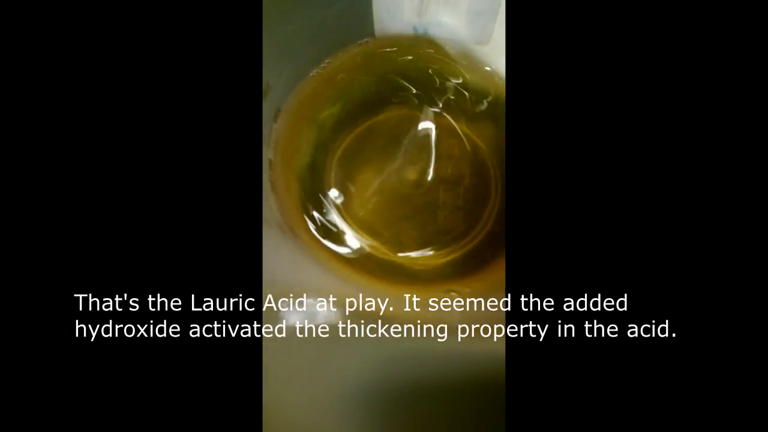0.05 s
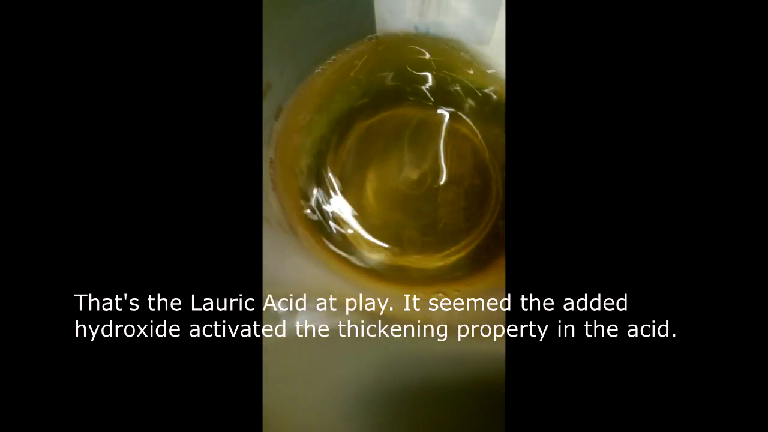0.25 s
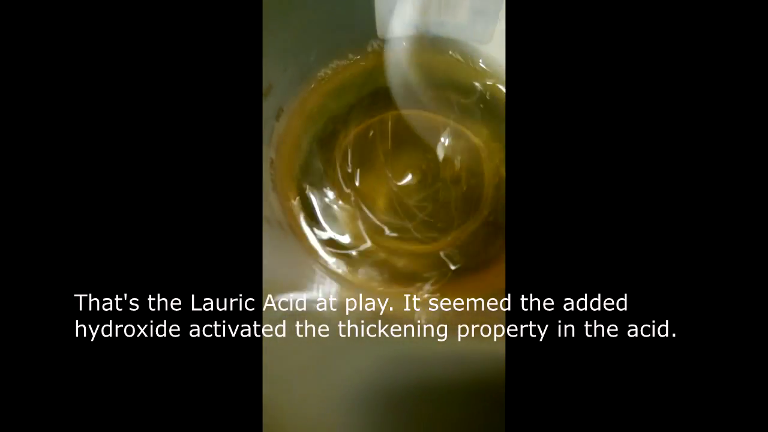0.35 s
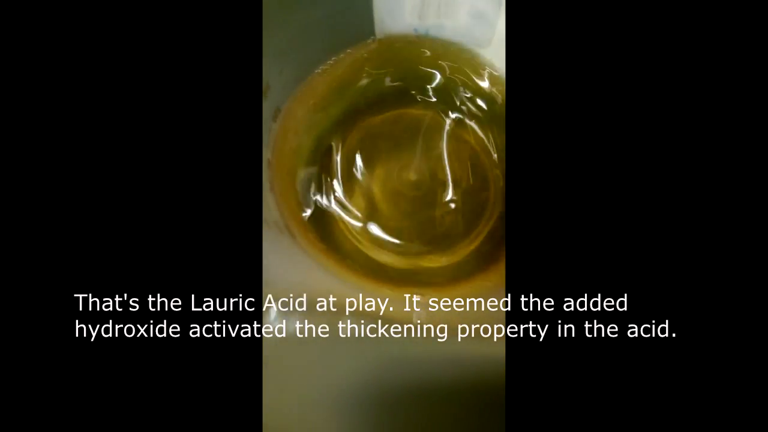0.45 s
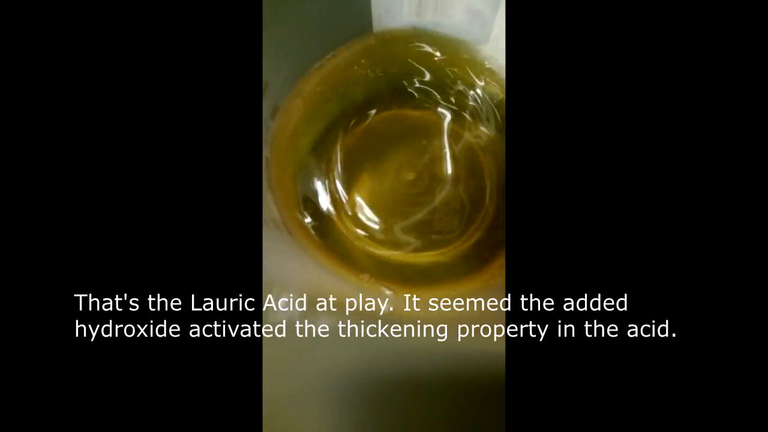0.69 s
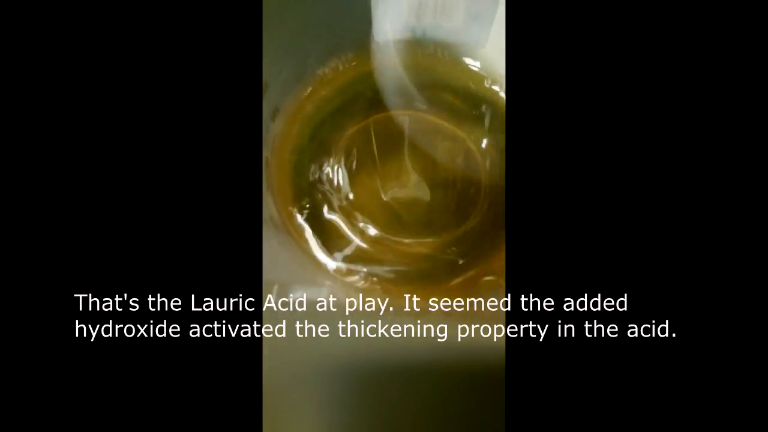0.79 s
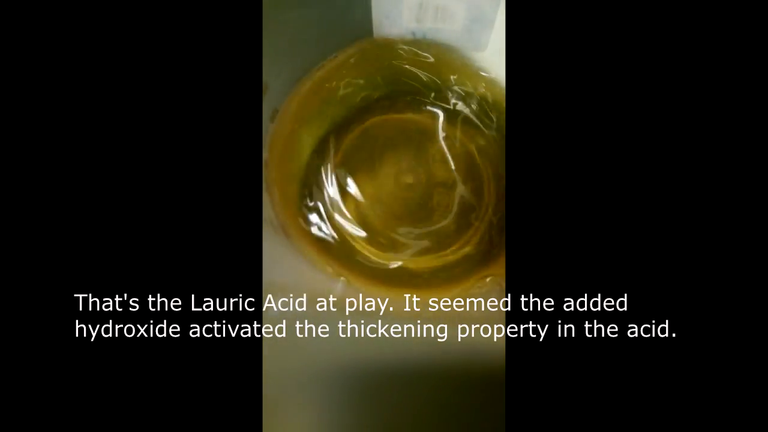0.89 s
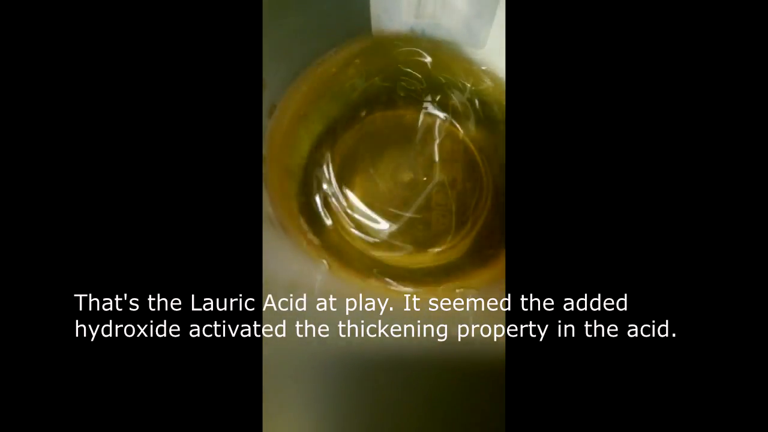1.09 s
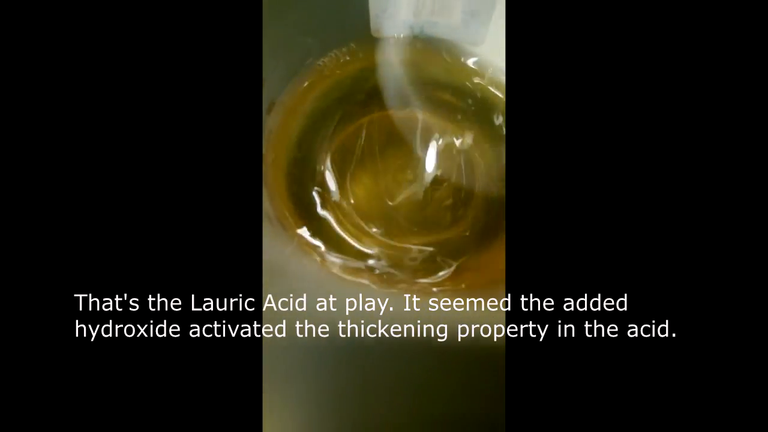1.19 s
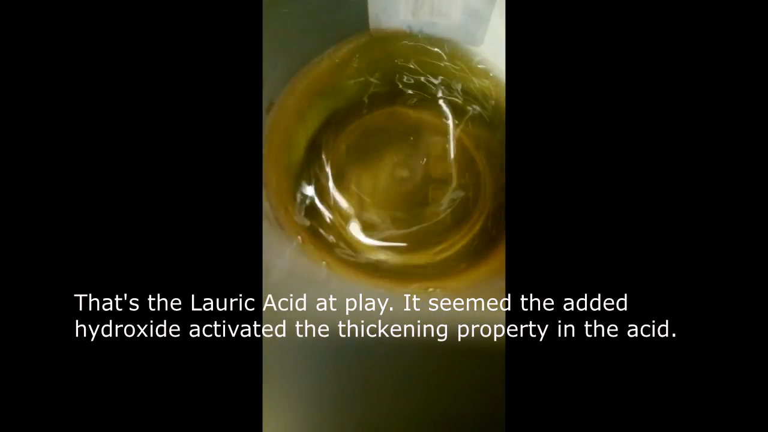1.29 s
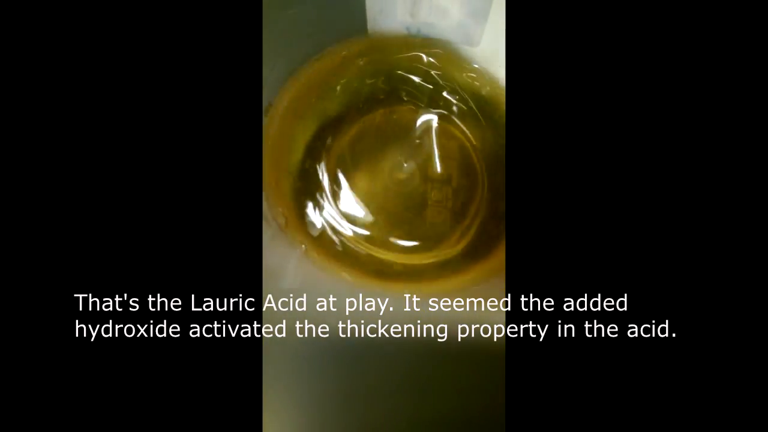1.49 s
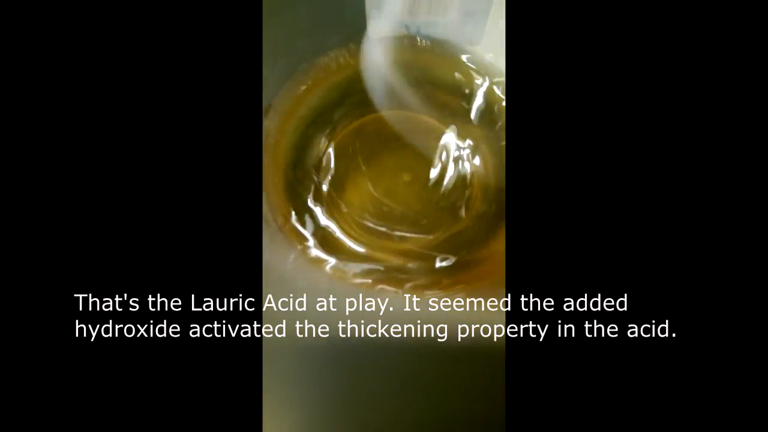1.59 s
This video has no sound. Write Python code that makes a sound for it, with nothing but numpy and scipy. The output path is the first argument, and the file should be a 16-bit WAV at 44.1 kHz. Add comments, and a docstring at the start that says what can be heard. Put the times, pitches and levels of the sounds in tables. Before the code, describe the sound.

Utensil knocks on a small cup of thick liquid, heard close. A soft, hollow clustered tap at 0.05 s leads into a thin scrape at 0.08. Dry, damped clacks follow at 0.24, 0.44, 0.53, a weaker 0.66, 0.85, 0.94, a light 1.07, then the strongest at 1.26 and 1.35. Low thuds and faint plops near 0.48, 0.95 and 1.15 accompany them. Kitchen reverberation, steady low rumble, faint hiss.

```python
"""Stirring a small cup

Close microphone in a kitchen: a utensil stirs thick liquid and knocks on the wall of a small cup.
Each knock rings short damped modes, a dry clack; some come with a low thud of sinking sines.
One brief rasp of filtered noise is the scrape; tiny plops are short sines that rise in pitch.
The room answers with decaying noise, over a steady low rumble and faint hiss of shaped noise."""
import sys
import numpy as np
from scipy import signal
from scipy.fft import rfft, irfft
from scipy.io import wavfile

SR = 44100
rng = np.random.default_rng(int(sys.argv[2]) if len(sys.argv) > 2 else 0)


def store_wav(level_fs):
    """Save 16-bit WAV to argv[1]."""
    pcm = np.round(np.clip(np.atleast_2d(level_fs), -1, 1) * 32767)
    wavfile.write(sys.argv[1], SR, pcm.T.astype(np.int16))


N = 72765

# Knocks of the utensil; each shifts the cup's pitch a little and sets the strength of each mode family: # (t/s,
# relative level/dB, pitch ratio, then extra level/dB for hollow, low, middle, high, crack)
KNOCKS = [(0.053, -2, 0.82, 12.5, -0.5, -7, -2.5, -14), (0.0558, 1, 0.94, -2, -2, -9, -0.5, -5),
          (0.0566, -5.5, 0.98, -6, -14, -1, -12, -10), (0.2413, 11.5, 1.009, -7, -9.5, 11.5, -11.5, -4.5),
          (0.4417, 10, 0.99, -9.5, -1.5, -2, 1.5, 2.5), (0.5332, 7.5, 0.98, -7.5, -0.5, 2.5, 8, 4),
          (0.6557, -2.5, 0.99, -3, 2.5, 1.5, 2, 3.5), (0.8546, 10, 1.009, 1.5, 2, 1, 3, 2.5),
          (0.943, 13, 1.001, 7.5, -6, -3.5, 6, 6), (0.9530, -0.5, 1.09, 4.5, -1.5, 2.5, 2, -14),
          (1.0714, 2.5, 0.97, -3, -2, 3.5, 0, 4), (1.2609, 16.5, 1.031, -7, 1, 0, 2, -3),
          (1.3492, 17, 0.99, -1.5, -16.5, -9, 2, -4)]
# Names of the mode families, in the order of the extra levels above
FAMILIES = ("hollow", "low", "middle", "high", "crack")
# Modes of the filled cup: (family, f/Hz, relative level/dB, t60/s, left minus right/dB)
CUP_MODES = [("hollow", 847.5, -7.5, 0.024, -13.5), ("low", 991, -5.5, 0.016, -11),
             ("low", 1146, -3, 0.025, -9), ("wall", 1852, -1.74, .015, -1.2),
             ("wall", 1930, -4.5, 0.024, -1.9), ("middle", 2743, 6.5, 0.01, -3.4),
             ("wall", 3027, 0, 0.021, 0.48), ("high", 3590, 1.15, 0.008, -0.66),
             ("high", 3880, -2.3, 0.016, 0), ("crack", 4810, -13, 0.0018, -9.5),
             ("crack", 6460, -20, 0.0022, 0.082), ("crack", 10750, -37, 0.0077, 0)]
# Dull thuds of the jolted cup and liquid: (t/s, starting f/Hz, peak level before panning/dB, t60/s)
THUDS = [(0.057, 234, -37, 0.063), (0.245, 97, -44, 0.13), (.534, 228, -38.5, 0.042),
         (.534, 610, -34.5, .02), (.54, 80, -46.5, 0.13), (.944, 163, -37, 0.034),
         (1.35, 220, -41.5, 0.084)]
# Small bubbles in the liquid: (t/s, starting f/Hz, peak level before panning/dB)
PLOPS = [(.481, 1190, -50), (.953, 876, -45), (1.154, 1100, -53)]
# Colour of the kitchen's diffuse tail: (f/Hz, relative level/dB)
ROOM_COLOUR = [(100, 7), (800, -19.5), (1400, -4), (1750, -3), (2020, 1), (2400, -7), (3100, -11.5),
               (3700, 4.5), (4200, -6), (5000, -3.5), (7000, -4.5), (14000, -3)]
# Steady background: (f/Hz, relative level per Hz/dB, left-right likeness, left minus right/dB)
BACKGROUND = [(20, -18.5, .3, 1), (55, -8, 0.9, -2), (118, -4.5, 0.83, 0), (165, 1, 0.91, 0.5),
              (198, -5.5, 0.87, -1), (239, 1.5, 1, 0), (370, -4.5, 0.67, 2), (400, -2, .7, 1),
              (467, -6, .65, 4.5), (654, -6.5, 0.17, -3.5), (1000, -19, 0, 5), (1980, -15.5, 0, 2),
              (3660, -20, 0.65, 14), (4850, -30, 0, 1.5), (7600, -35.5, 0, 6.5), (15700, -36, 0.11, 3)]

# Levels in dB, pans as left minus right in dB
KNOCK_DB, LEFT_LAG_S = -16, 0.00062
MODE_SPREAD = 1.243  # each mode radiates within this ratio of its pitch
SKID_S, SKID_SIZE, SKIDS_PER_S = 0.0022, 0.75, 2400  # the tip skids briefly on the wall
TICK_DB, TICK_DECAY_S = -33, 0.00044  # bright crack of the contact, level relative to the knock
THUD_SAG_PER_S, THUD_PAN_DB = 6.5, -9
SCRAPE_S, SCRAPE_WIDTH_S, SCRAPE_HZ, SCRAPE_DB, SCRAPE_PAN_DB = 0.0755, 0.0035, 3930, -42, -5.5
PLOP_T60_S, PLOP_RISE_PER_S, PLOP_PAN_DB = 0.02, 3.9, -16
ROOM_DB, ROOM_T60_S, ROOM_PAN_DB = -16, 0.72, 11
NEAR_DB, NEAR_T60_S = -21, 0.1  # early reflections from the worktop
BACKGROUND_DB, CUTOFF_HZ = -51.5, 16200


def from_db(db):
    """Turn decibels into an amplitude factor."""
    return 10 ** (np.asarray(db) / 20)


def unit(x):
    """Scale each channel to an energy of one."""
    return x / np.sqrt(np.sum(x ** 2, axis=-1, keepdims=True) + 1e-20)


def pan(db):
    """Left and right gains for a level difference."""
    return from_db([[db / 2], [-db / 2]])


def clock(s):
    """Time axis in seconds."""
    return np.arange(int(s * SR)) / SR


def add(out, s, x):
    """Mix a sound in at a time."""
    i = int(s * SR)
    out[..., i:i + x.shape[-1]] += x[..., :N - i]


def per_bin(points):
    """Spread the columns of a spectrum table over every frequency bin, on a log frequency axis."""
    hz, *columns = np.transpose(points)
    bins = np.maximum(np.arange(N // 2 + 1) * SR / N, 1)
    return [np.interp(np.log(bins), np.log(hz), column) for column in columns]


def ring(force, hz, t60):
    """A driven, damped resonance, narrowed by a band filter to steep skirts."""
    radius = from_db(-60 / (t60 * SR))
    angle = 2 * np.pi * hz / SR
    # The tiny offset keeps the filter clear of vanishingly small numbers
    resonance = signal.lfilter([1, -1], [1, -2 * radius * np.cos(angle), radius ** 2], force + 1e-18)
    band = [hz / MODE_SPREAD, hz * MODE_SPREAD]
    skirts = signal.butter(2, band, "band", fs=SR, output="sos")
    return signal.sosfilt(skirts, resonance)


def knocks():
    """Each knock rings the damped modes of the cup; the left side hears it a little later."""
    out, t = np.zeros((2, N)), clock(0.15)
    for s, level_db, pitch, *extra_db in KNOCKS:
        extra = dict(zip(FAMILIES, extra_db))
        tick = unit(rng.standard_normal((2, len(t))) * np.exp(-t / TICK_DECAY_S))
        knock = from_db(TICK_DB + extra["crack"]) * tick
        for family, hz, db, t60, pan_db in CUP_MODES:
            mode = unit(ring(contact(t), hz * pitch, t60))
            # Modes outside the named families take no extra level
            knock = knock + from_db(db + extra.get(family, 0)) * pan(pan_db) * mode
        knock = knock * from_db(KNOCK_DB + level_db)
        add(out[0], s + LEFT_LAG_S, knock[0])
        add(out[1], s, knock[1])
    return out


def contact(t):
    """The force of a first touch and random smaller skids, drawn separately for each side."""
    skids = (rng.random((2, len(t))) < SKIDS_PER_S / SR) * (t < SKID_S)
    sizes = SKID_SIZE * rng.uniform(0.65, 1, skids.shape)
    force = skids * sizes * rng.choice([-1, 1], skids.shape)
    force[:, 0] = 1
    return force


def thuds():
    """Some knocks come with a few low cycles that sink in pitch as they die."""
    out, t = np.zeros(N), clock(0.2)
    for s, hz, db, t60 in THUDS:
        turns = hz * np.cumsum(np.exp(-THUD_SAG_PER_S * t)) / SR
        decay = from_db(db - 60 * t / t60)
        add(out, s, decay * np.sin(2 * np.pi * turns))
    return out * pan(THUD_PAN_DB)


def scrape():
    """The tip slides along the wall: a short swell of noise through one resonance, a thin rasp."""
    t = np.arange(N) / SR
    swell = np.exp(-0.5 * ((t - SCRAPE_S) / SCRAPE_WIDTH_S) ** 2)
    rasp = unit(ring(rng.standard_normal((2, N)), SCRAPE_HZ, 0.006))
    rasp = rasp * np.sqrt(N)  # from unit energy to unit RMS
    return from_db(SCRAPE_DB) * swell * rasp * pan(SCRAPE_PAN_DB)


def plops():
    """Bubbles in the liquid ring briefly and rise in pitch."""
    out, t = np.zeros(N), clock(2 * PLOP_T60_S)
    for s, hz, db in PLOPS:
        turns = hz * t * (1 + PLOP_RISE_PER_S * t / 2)
        decay = from_db(db - 60 * t / PLOP_T60_S)
        add(out, s, decay * np.sin(2 * np.pi * turns))
    return out * pan(PLOP_PAN_DB)


def kitchen(x):
    """Quick reflections from nearby, with a longer diffuse tail that is stronger on the left."""
    t = np.arange(N) / SR
    onset = np.clip(t / 0.0025 - 0.5, 0, 1)  # silent at first, then a fast fade-in
    far = unit(rng.standard_normal((2, N)) * onset * from_db(-60 * t / ROOM_T60_S))
    near = unit(rng.standard_normal((2, N)) * onset * from_db(-60 * t / NEAR_T60_S))
    colour_db, = per_bin(ROOM_COLOUR)
    far = irfft(rfft(far) * from_db(colour_db), N)
    far = far * onset * (t < ROOM_T60_S * 1.5)
    response = from_db(ROOM_DB) * pan(ROOM_PAN_DB) * far + from_db(NEAR_DB) * near
    return signal.fftconvolve(x, response, axes=1)[:, :N]


def background():
    """Low room rumble, mostly alike on both sides, under a faint, more diffuse hiss."""
    db, alike, pan_db = per_bin(BACKGROUND)
    alike = np.clip(alike, -1, 1)
    mid, side = rfft(rng.standard_normal((2, N)))
    # Shared noise makes the sides alike; noise of opposite sign sets them apart
    sides = np.sqrt(1 + alike) * mid + np.sqrt(1 - alike) * side * [[1], [-1]]
    levels_db = np.array([db + pan_db / 2, db - pan_db / 2])
    noise = irfft(sides * from_db(levels_db), N)
    return from_db(BACKGROUND_DB) * noise / noise.std()


def scene():
    """The cup up close, the kitchen's answer to it and the background."""
    cup = knocks() + thuds() + scrape() + plops()
    return cup + kitchen(cup) + background()


def record(dry):
    """A steep low-pass cuts the top."""
    lowpass = signal.ellip(10, 0.1, 70, CUTOFF_HZ, fs=SR, output="sos")
    return signal.sosfilt(lowpass, dry)


dry = scene()
out = record(dry)
store_wav(out)
```